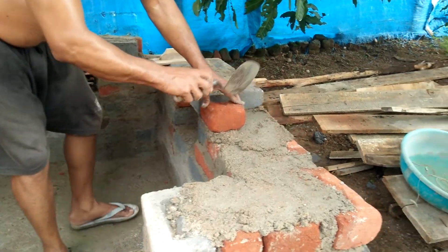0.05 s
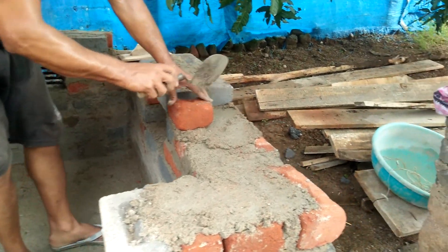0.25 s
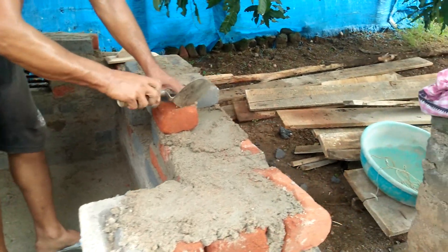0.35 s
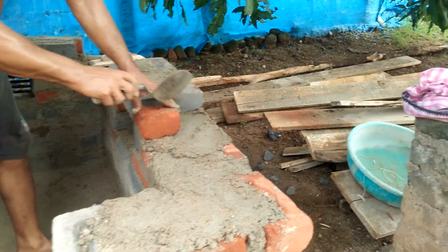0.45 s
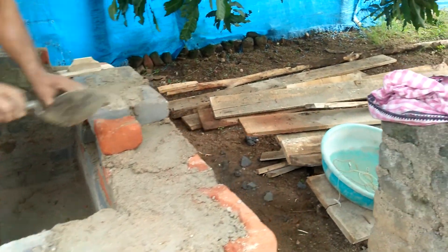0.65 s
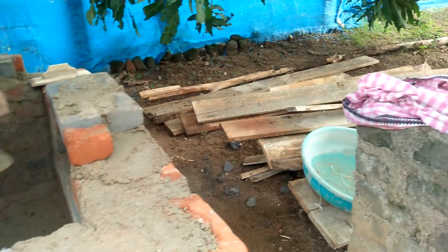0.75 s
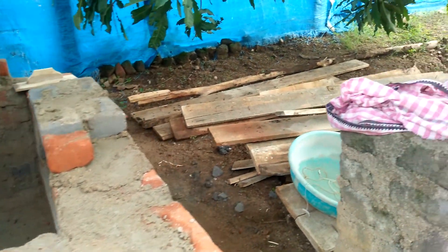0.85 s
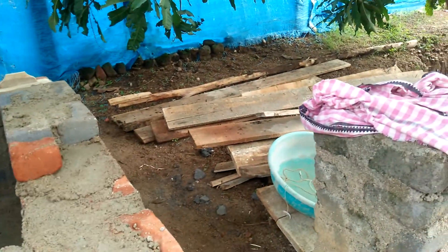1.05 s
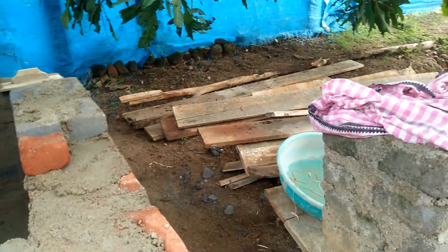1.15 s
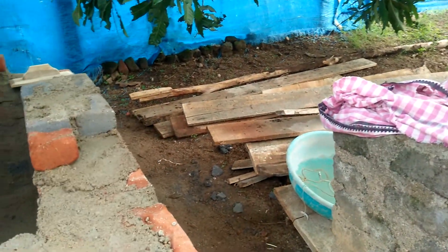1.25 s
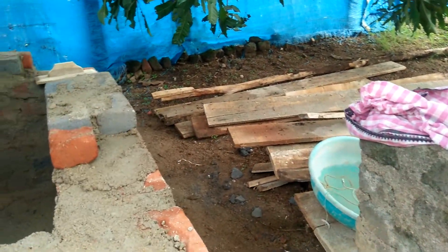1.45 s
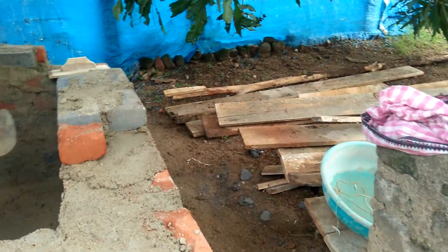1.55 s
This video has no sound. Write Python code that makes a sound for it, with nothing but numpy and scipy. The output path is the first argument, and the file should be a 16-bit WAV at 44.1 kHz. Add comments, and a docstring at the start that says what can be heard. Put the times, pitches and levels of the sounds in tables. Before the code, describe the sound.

Two short, ringing clinks of a metal trowel on brick sound nearby, amid soft sandy scraping. A light dry knock comes later, over quiet outdoor air with a barely audible distant engine and one faint bird chirp.

```python
"""Faint gritty scraping, then two bright clinks: a steel trowel taps a brick into wet mortar.
Each blow excites the modes of the hand-damped blade and a low thud in the wall. Sand grains crack
under the steel in further short scrapes, and one stroke ends in a light knock. Behind the work,
in quiet outdoor air, a small engine putters far off, a thin tone whines and a bird gives one
faint falling chirp."""
import sys
import numpy as np
from scipy import signal
from scipy.fft import rfft, irfft
from scipy.io import wavfile

SR = 44100
rng = np.random.default_rng(int(sys.argv[2]) if len(sys.argv) > 2 else 0)


def unload_wav(signal):
    """Save mono or channel-first audio to the path in sys.argv[1] as 16-bit WAV at rate SR, clipped to [-1, 1]."""
    wavfile.write(
        sys.argv[1],
        SR,
        np.round(np.clip(np.atleast_2d(signal).T, -1, 1) * 32767).astype(np.int16),
    )


N = 70560
T = np.arange(N) / SR

# Spectrum of the outdoor air. Each row: frequency in Hz, relative density in dB.
AIR_SPECTRUM = [(15, -11.5), (40, 5.5), (100, 5.5), (190, -6.5), (300, -13.5), (500, -20.5), (800, -22.5),
                (1100, -12), (1600, -17), (2200, -14), (2600, -17), (3200, -13), (4400, -14), (6700, -27.5),
                (10000, -31.5), (14000, -33.5), (15500, -52)]
# Course of the air's loudness. Each row: time in seconds, relative level in dB.
AIR_ENVELOPE = [(0, 6), (.5, 4), (.75, 1), (1.25, 2.5), (1.6, 0.5)]
# Resonances of the exhaust. Each row: frequency in Hz, t60 in seconds, relative level in dB.
EXHAUST_MODES = [(58, 0.09, -13.5), (112, 0.012, -9.5), (142, 0.18, -3), (167.59, 0.12, 0.5),
                 (374, 0.058, -20)]
# Course of the engine's loudness. Each row: time in seconds, relative level in dB.
ENGINE_ENVELOPE = [(0, 1), (.6, 0), (.85, -3.5), (1.03, -1), (1.3, -5), (1.6, -9)]
# Course of the whine's loudness. Each row: time in seconds, level in dB.
WHINE_ENVELOPE = [(0, -82.5), (.55, -82.5), (.7, -86), (1.1, -80), (1.4, -78.5), (1.6, -84.5)]

# Scraping strokes. Each row: peak time, rise and fall in seconds, level in dB, tilt in dB per octave.
SCRAPE_STROKES = [(0.033, 0.024, 0.063, -61, -3.5), (0.126, 0.0062, .015, -57.5, -4),
                  (0.158, 0.0082, 0.053, -61.5, -3.5), (.305, 0.0091, 0.031, -58, -3),
                  (0.349, 0.0093, 0.01722, -59, -2), (0.382, 0.019, 0.014, -42.5, 0.5),
                  (0.435, 0.018, 0.024, -51, 1), (0.584, 0.021, 0.023, -57.5, 1),
                  (0.636, 0.018, 0.021, -64, -2), (0.67, 0.00431, 0.013, -59.5, -3.5),
                  (.768, 0.0066, 0.034, -62, -1), (0.821, .012, 0.0089, -65, -0.5),
                  (0.85, 0.0013, 0.0053, -58, 0.5), (0.916, 0.027, 0.015, -64, 4),
                  (0.955, 0.0022, 0.013, -59.5, 2), (0.984, 0.0067, 0.043, -48, 0),
                  (1.029, 0.0064, 0.0082, -51, -1.5), (1.062, 0.011, 0.013, -62, -4.5),
                  (1.096, 0.007356, 0.0078, -67, 3), (1.128, 0.01, 0.0213, -69.5, -6),
                  (1.173, 0.0081, 0.017, -41.5, -1), (1.202, 0.012, 0.02, -56.5, -9.5)]
# Knocks against brick. Each row: start in seconds, click level in dB, thud level in dB.
KNOCK_BLOWS = [(1.1795, -27, -51)]
# Trowel taps. Each row: start in seconds, level in dB, place of contact (0 the flat, 1 the edge),
# clatter and thud in dB relative to that level.
TAP_BLOWS = [(0.2429, -3.5, 0.088, -23.5, -39), (0.4488, -1.5, 0.84, -17, -41.5)]
# Light touches of the blade. Each row: start in seconds, level in dB.
BLADE_TOUCHES = [(0.297, -39)]

# Spectra of the contact noises. Each row: frequency in Hz, relative density in dB.
GRIT_SPECTRUM = [(300, -24.5), (600, -24.5), (1100, -16), (1900, -7.5), (3000, 1), (4100, 2.5), (5000, -5),
                 (6300, -16), (9500, -26.5), (13500, -37), (15000, -56.5)]  # sand under steel
THUD_SPECTRUM = [(25, -15), (60, -0.5), (110, -4.5), (200, 0.5), (300, -11.5), (600, -25.5), (2000, -65.5)]  # the wall, struck through mortar
KNOCK_SPECTRUM = [(300, -23.5), (700, -26), (1800, -19.5), (2700, -16), (3300, 4.5), (3750, 1.5),
                  (4500, -3.5), (5300, -18), (6300, -14.5), (7500, -29), (10000, -33.5), (13000, -53),
                  (15000, -63)]  # a dry knock on brick
TICK_SPECTRUM = [(500, -8), (3000, -0.5), (11500, 2.5), (13000, -17.5), (16000, -25.5)]  # the first instant of a tap
CLATTER_SPECTRUM = [(200, -11.5), (450, -13.5), (800, -19.5), (1100, -6.5), (1950, -6.5), (3000, -4),
                    (4300, 5), (4900, -15), (5600, -10.5), (6900, -18.5), (9000, -13.5), (11300, -11.5),
                    (12100, -32.5), (13600, -32.5), (14300, -50), (16000, -62)]  # dense short modes of brick and blade

# Modes of the struck bodies. Each row: frequency in Hz, t60 in seconds,
# relative level in dB under a flat blow, the same under an edge blow.
WALL_MODES = [(62, .1, -44.5, -50), (106, 0.031, -44, -55), (165, 0.069, -40, -47.5),
              (199.07, 0.14, -46, -37.5), (384, 0.045, -42.5, -46.5)]
BLADE_MODES = [(652, .047, -26, -46), (980, .03, -30, -30), (1178, .073, -26, -20), (1515, .044, -22, -36),
               (1556, .049, -42, -18), (1649, .05, -44, -23.5), (1725, .055, -32, -36),
               (1780, .064, -42, -16.5), (2272, .055, -35, -27), (2673, .059, -20, -8.8),
               (2922, .058, -24, -13.5), (3252, .058, -31, -25), (3522, .07, -39, -27),
               (3937, .052, -28, -20), (4200, .05, -40, -20.5), (4365, .054, -30, -16),
               (4520, .025, -42, -18), (5128, .053, -43, -18.5), (5620, .065, -50, -32),
               (6245, .07, -52, -32), (7866, .064, -35, -28), (8332, .068, -44, -31),
               (10690, .07, -48, -35), (11435, .05, -35, -26)]

HOLD_S = .004  # each clink stays at full level this long, as a ground reflection joins it, then fades


def undb(db):
    """Amplitude ratio of a level in decibels."""
    return 10 ** (np.asarray(db) / 20)


def unit(x):
    """Normalisation to rms 1."""
    return x / np.sqrt(np.mean(x ** 2))


def curve(points):
    """Gain over time, interpolated between points of seconds and dB."""
    return undb(np.interp(T, *np.array(points).T))


def colour(x, spectrum):
    """Spectral shaping: a filter through points of Hz and dB, with the result at rms 1."""
    hz, db = np.array(spectrum).T
    bins_hz = np.maximum(np.fft.rfftfreq(N, 1 / SR), 1)
    gain = undb(np.interp(np.log(bins_hz), np.log(hz), db))
    return unit(irfft(rfft(x) * gain, N))


def noise(spectrum):
    """Gaussian noise filtered to the given spectrum."""
    return colour(rng.standard_normal(N), spectrum)


def wander(rate_hz):
    """Random fluctuation: straight lines between Gaussian values of spread 1."""
    knots = np.arange(0, T[-1] + 1, 1 / rate_hz)
    return np.interp(T, knots, rng.standard_normal(len(knots)))


def strike(start, attack, t60, hold=0):
    """Envelope of a damped vibration: linear rise, hold, then a fall of 60 dB every t60 seconds."""
    age = np.maximum(T - start, 0)
    decay = np.exp(-np.log(1000) * np.maximum(age - attack - hold, 0) / t60)
    return np.minimum(age / attack, 1) * decay


def smear(x, t60):
    """Phase dispersion: the phase of a diffuse tail spreads a sound in time without colouring it."""
    tail = rng.standard_normal(N) * strike(0, 1 / SR, t60)
    return irfft(rfft(x) * np.exp(1j * np.angle(rfft(tail))), N)


def ring(modes, start, place, attack):
    """Modal superposition: the place of contact sets how strongly each damped mode rings."""
    out = 0
    for hz, t60, flat_db, edge_db in modes:
        detuned_hz = hz * (1 + .0005 * rng.standard_normal())
        phase = 2 * np.pi * (detuned_hz * (T - start) + rng.random())
        gain = undb(flat_db + place * (edge_db - flat_db))
        out += gain * strike(start, attack, t60, HOLD_S) * np.sin(phase)
    return out


def air():
    """Ambient noise: a broad spectrum, strongest in the bass, whose level flickers slightly."""
    flicker = undb(0.28 * wander(30))
    return undb(-70) * curve(AIR_ENVELOPE) * flicker * noise(AIR_SPECTRUM)


def whine(hz=1091.6, octave_db=-8.5):
    """Random modulation makes a thin, far tone and its octave waver in pitch and level."""
    phase = 2 * np.pi * np.cumsum(hz * (1 + 0.01 * wander(87))) / SR
    tone = unit(np.sin(phase) + undb(octave_db) * np.sin(2 * phase))
    return curve(WHINE_ENVELOPE) * undb(2 * wander(25)) * tone


def engine(firing_hz=30.1, jitter_s=.0003, spread_db=1.5, firings=60):
    """Source and resonator: a nearly periodic train of firings rings the modes of a far exhaust."""
    timing, strength = rng.standard_normal((firings, 2)).T
    times = 0.023 + np.arange(firings) / firing_hz + jitter_s * timing
    pulses = np.bincount((times * SR).astype(int), undb(spread_db * strength), N)[:N]
    pipe = sum(undb(db) * strike(0, attack=.006, t60=t60) * np.sin(2 * np.pi * hz * T)
               for hz, t60, db in EXHAUST_MODES)
    putter = unit(signal.fftconvolve(pulses, pipe)[:N])
    return undb(-63.5) * curve(ENGINE_ENVELOPE) * putter


def bird(start=1.333, from_hz=3750, to_hz=2780, glide_s=.045):
    """A distant bird's falling note, roughened by frequency modulation and blurred by echoes."""
    hz = to_hz + (from_hz - to_hz) * np.exp(-np.maximum(T - start, 0) / glide_s)
    phase = 2 * np.pi * np.cumsum(hz * (1 + .055 * wander(600))) / SR
    note = strike(start, attack=0.023, t60=.3) * np.sin(phase)
    return undb(-61.5) * smear(note, t60=.09)


def scrapes(grains_per_s=4000, spread_db=2, pivot_hz=3500):
    """Friction as shot noise: sand grains catch and crack under the steel in short strokes."""
    signs = rng.choice([-1, 1], N)
    sizes = undb(spread_db * np.minimum(rng.exponential(size=N), 4))
    cracks = rng.random(N) < grains_per_s / SR
    grit = smear(cracks * signs * sizes, t60=0.0097)
    rumble = undb(-14) * noise(THUD_SPECTRUM)  # the brick shifts in its bed
    out = 0
    for peak, rise, fall, db, tilt in SCRAPE_STROKES:
        tilted = [(hz, level + tilt * np.log2(hz / pivot_hz)) for hz, level in GRIT_SPECTRUM]
        width = np.where(T < peak, rise, fall)
        pressure = np.exp(-np.abs((T - peak) / width) ** 1.5)
        out += undb(db) * pressure * (colour(grit, tilted) + rumble)
    return out


def thud(start):
    """Transmission through the mortar: the wall takes the blow as a burst of low noise."""
    return noise(THUD_SPECTRUM) * strike(start, attack=0.0045, t60=0.12)


def knock():
    """A heavily damped impact: a stroke ends against brick with a dry click and almost no ring."""
    out = 0
    for start, db, thud_db in KNOCK_BLOWS:
        click = strike(start, attack=0.0019, t60=0.012)
        tail = undb(-4.5) * strike(start, attack=0.0019, t60=0.087)
        out += undb(db) * noise(KNOCK_SPECTRUM) * (click + tail) + undb(thud_db) * thud(start)
    return out


def trowel_taps(blade_attack_s=.0025):
    """Impact excitation: each tap sets blade, brick and wall vibrating; a touch rings only the blade."""
    out = 0
    for start, db, place, clatter_db, thud_db in TAP_BLOWS:
        tick = undb(-27) * noise(TICK_SPECTRUM) * strike(start, attack=.0015, t60=.008)
        direct = strike(start, attack=0.0019, t60=0.078, hold=HOLD_S)
        yard_tail = undb(-42) * strike(start, attack=0.056, t60=0.16)
        clatter = undb(clatter_db) * noise(CLATTER_SPECTRUM) * (direct + yard_tail)
        wall = ring(WALL_MODES, start, place, attack=.007) + undb(thud_db) * thud(start)
        blade = ring(BLADE_MODES, start, place, blade_attack_s)
        out += undb(db) * (tick + blade + clatter + wall)
    for start, db in BLADE_TOUCHES:
        out += undb(db) * ring(BLADE_MODES, start, place=0, attack=blade_attack_s)
    return out


def scene():
    """Superposition: the bricklaying and the quiet outdoor background add in one channel."""
    bricklaying = trowel_taps() + scrapes() + knock()
    background = engine() + whine() + bird() + air()
    return (bricklaying + background)[None]


def record(dry):
    """Band limiting: filters remove the deepest bass and the highest treble."""
    highpass = signal.butter(2, 33, "high", fs=SR, output="sos")
    lowpass = signal.ellip(8, .2, 70, 16000, fs=SR, output="sos")
    return signal.sosfilt(lowpass, signal.sosfilt(highpass, dry))


dry = scene()
out = record(dry)
unload_wav(out)
```